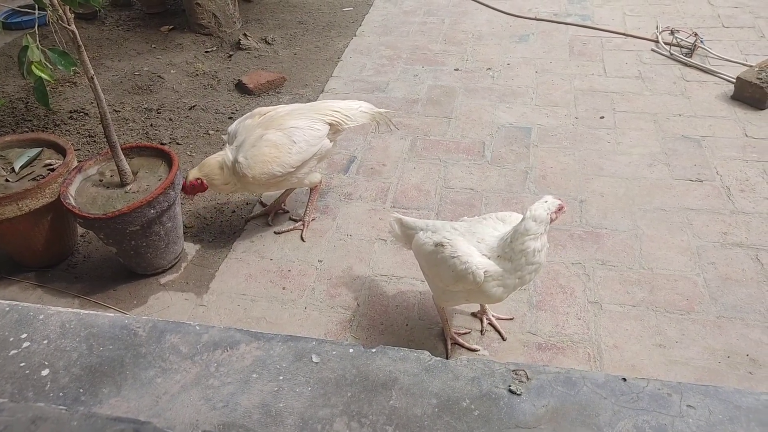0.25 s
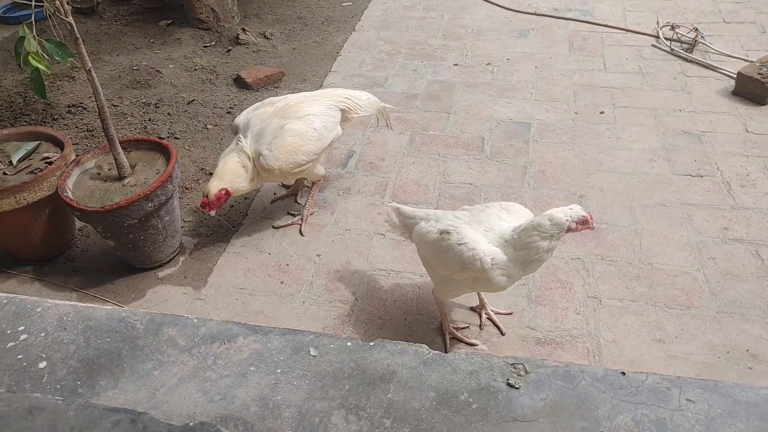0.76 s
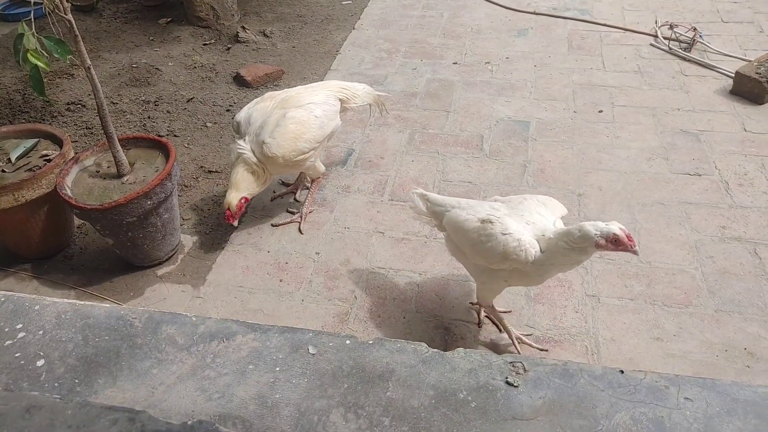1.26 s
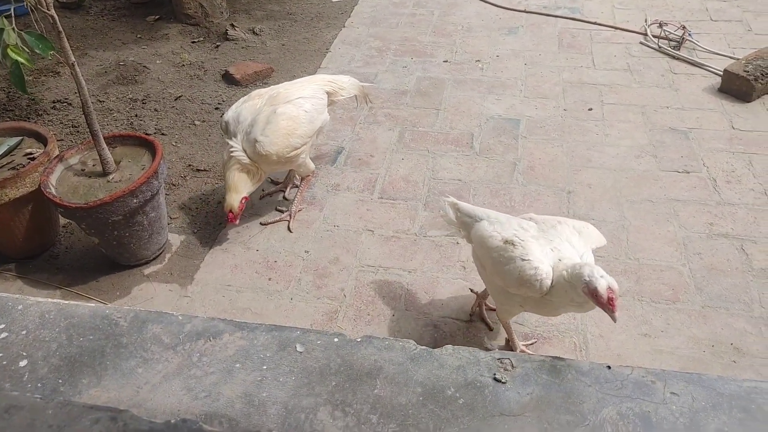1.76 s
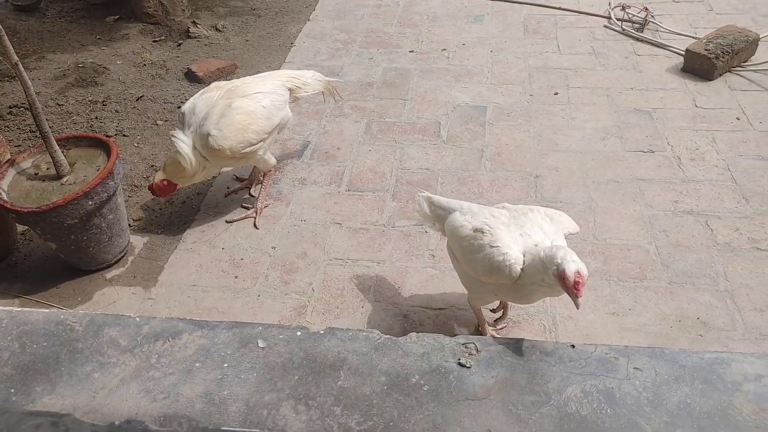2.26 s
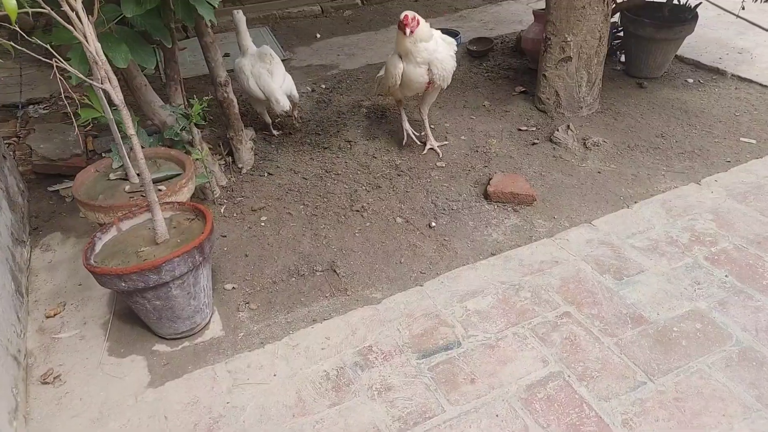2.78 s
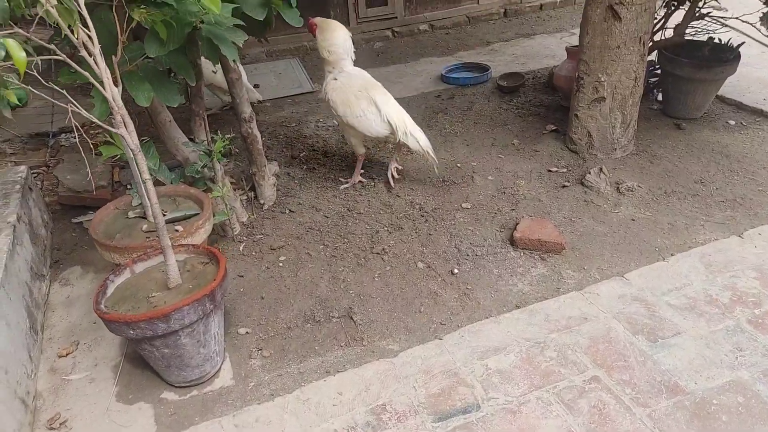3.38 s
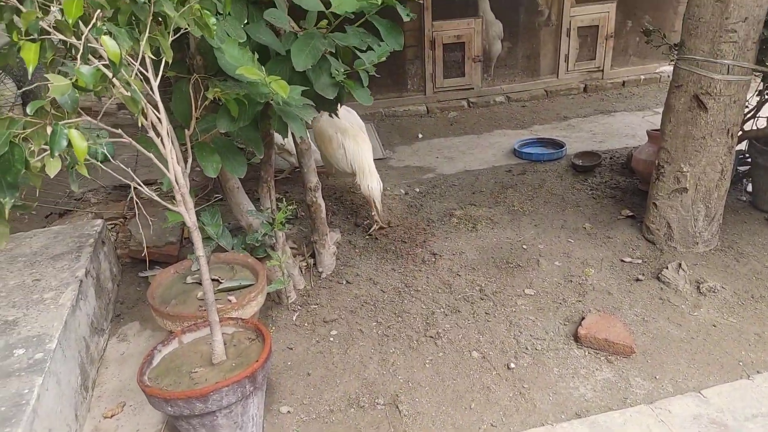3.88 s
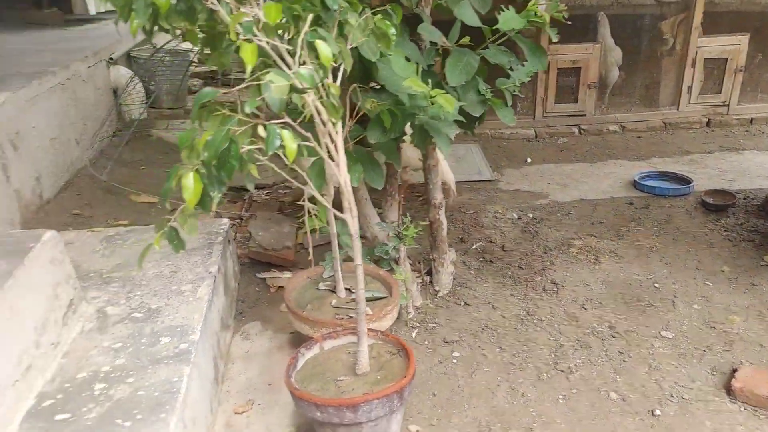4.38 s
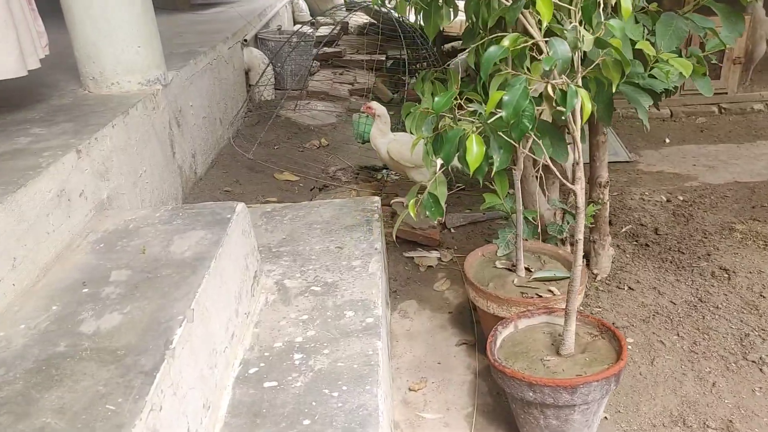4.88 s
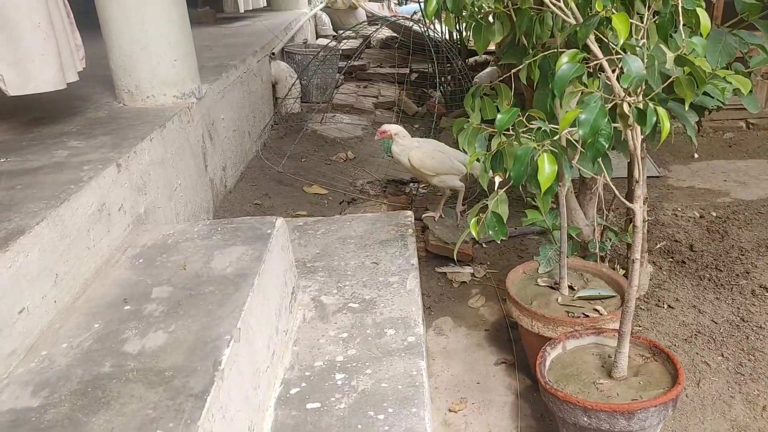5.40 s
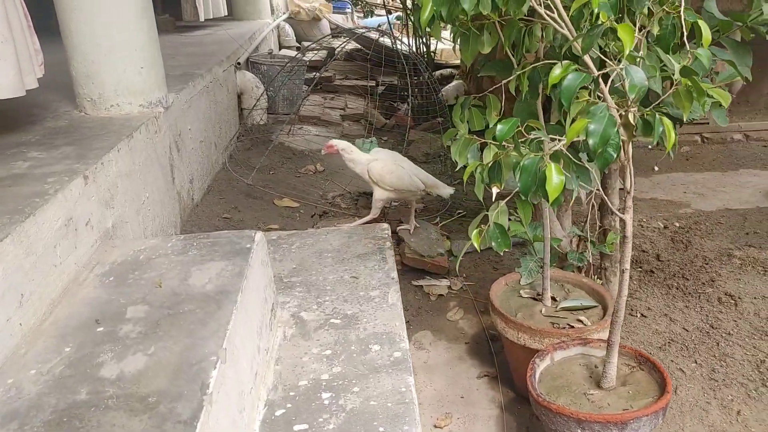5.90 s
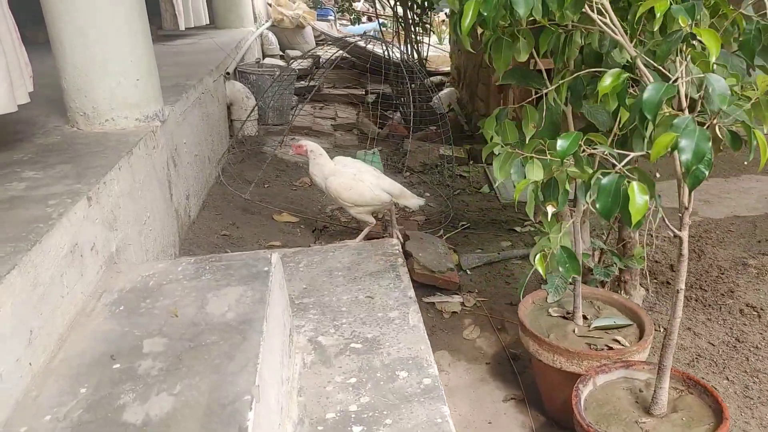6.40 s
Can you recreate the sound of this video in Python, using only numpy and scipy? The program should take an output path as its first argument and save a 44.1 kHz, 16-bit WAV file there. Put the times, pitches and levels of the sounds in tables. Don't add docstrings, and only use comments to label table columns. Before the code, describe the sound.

Constant high chick peeping fills an echoing courtyard, with low hen clucks, raspy squawks, sharp sparrow chips and a brief silent gap midway.

```python
import sys
import numpy as np
from scipy import signal
from scipy.fft import rfft, irfft, next_fast_len
from scipy.io import wavfile
from scipy.ndimage import uniform_filter1d, map_coordinates

SR = 44100
rng = np.random.default_rng(int(sys.argv[2]) if len(sys.argv) > 2 else 0)


def wrap_up_sound(samples):
    columns = np.atleast_2d(samples).T
    tamed = np.clip(columns, -1, 1)
    steps = np.round(tamed * 32767).astype(np.int16)
    wavfile.write(sys.argv[1], SR, steps)


def makeup_ratio(level_db):
    decades = np.asarray(level_db, float) / 20
    return 10 ** decades


N = 293265


def unit(x):
    return x / np.sqrt(np.mean(x ** 2) + 1e-20)


def along(points, hz):
    f, value = np.transpose(points)
    return np.interp(np.log(hz + 1), np.log(f + 1), value)


def curves(rows):
    s, *columns = np.transpose(rows)
    return [np.interp(np.arange(N) / SR, s, column) for column in columns]


def wobble(n, rate):
    knots = rng.standard_normal(int(n * rate / SR) + 4)
    return map_coordinates(knots, [np.arange(n) * rate / SR])


def filtered(x, response):
    m = next_fast_len(x.shape[-1] + SR // 10)
    return irfft(rfft(x, m) * response(np.fft.rfftfreq(m, 1 / SR)), m)[..., :x.shape[-1]]


def modes(rows, f):
    total = 0
    for k, (centre, width, db) in enumerate(rows):
        total = total + (-1) ** k * makeup_ratio(db) * 1j * f * width / (centre * centre - f * f + 1j * f * width)
    return total


# f/Hz, coherence/1
ALIKE = [(40, .05), (85, .45), (140, 1), (300, 0.74), (700, 0.48), (1400, 0.023), (3000, 0.0033)]


def paired(z, hz):
    turn = np.arccos(np.clip(along(ALIKE, hz), -1, 1))[:, None] / 2
    shared, opposed = np.cos(turn) * z[0], np.sin(turn) * z[1]
    return np.array([shared + opposed, shared - opposed])


def rush(gain, patchy_db):
    hz, _, z = signal.stft(rng.standard_normal((2, N)), SR, nperseg=512)
    field = uniform_filter1d(rng.standard_normal(z.shape[1:]), size=6, axis=0)
    field = uniform_filter1d(field, size=12, axis=1)
    noise = signal.istft(paired(z, hz) * makeup_ratio(patchy_db * unit(field)), SR, nperseg=512)[1][:, :N]
    return unit(filtered(noise, gain))


def add(track, s, sound, lag):
    for port, start in zip(track, (round(s * SR), round(s * SR + lag))):
        piece = port[max(start, 0):start + len(sound)]
        piece += sound[max(-start, 0):][:len(piece)]


# t/s, level/dB, length/s, pulse rate/Hz, open beak level/dB
SQUAWKS = [(-.06, -51.5, 0.079, 241.6, -52), (0.397, -49, 0.071, 240.5, -5), (0.92, -45.5, 0.11, 244, -4),
           (1.97, -51.5, 0.1, 258.8, -7.5), (3.094, -42.5, 0.1, 233, -5), (3.325, -70.5, 0.027, 210, -5),
           (3.728, -46, 0.062, 243.3, -0.9), (4.124, -67, 0.072, 262.8, 6), (5.088, -48.5, .084, 229.3, -6),
           (5.991, -42, 0.12, 211.7, -0.5), (6.422, -59, 0.082, 251.2, -8.5),
           (6.605, -42, 0.063, 233.7, -0.5)]
# f/Hz, width/Hz, level/dB
CHEST = [(295, 63, 2.8), (440, 20, 6.3)]
# f/Hz, width/Hz, level/dB
THROAT = [(704, 430, -0.5), (1024, 160, 4.5)]
# f/Hz, width/Hz, level/dB
BEAK = [(1337, 106, -3.5), (1923, 215, -1.5)]


def squawks():
    out = np.zeros((2, N))
    for s, db, length, rate_hz, beak_db in SQUAWKS:
        n = SR // 4
        u = np.clip(np.arange(n) / (length * SR), 0, 1)
        cycle = np.cumsum(rate_hz * (.89 + .16 * np.sin(2.7 * u) + .045 * wobble(n, 120))) / SR
        alternation = 1 + .2 * (-1) ** np.floor(cycle)
        pulses = np.diff(np.floor(cycle), prepend=0) * alternation * makeup_ratio(rng.normal(0, 3, n))
        rasp = rng.standard_normal(n) * np.exp(-3 * (cycle % 1))
        source = (unit(pulses) + .22 * unit(rasp)) * np.sin(np.pi * u ** .85) ** 1.4

        def tract(f):
            resonances = makeup_ratio(-6.5) * modes(CHEST, f) - modes(THROAT, f) - makeup_ratio(beak_db) * modes(BEAK, f)
            return resonances * (f / 330) ** 4 / (1 + (f / 330) ** 4) / (1 + (f / 2200) ** 8)

        voice = filtered(source, tract)
        add(out, s, makeup_ratio(db) * unit(voice) * np.sqrt(n / (length * SR)), 15)
    return out


# t/s, f/Hz, level/dB
CROON = [
    (6.018, 426, -93),
    (6.043, 466.5, -28.5),
    (6.091, 419.6, -40),
    (6.137, 396.3, -34),
    (6.2, 425, -47),
]


def croon():
    hz, level_db = curves(CROON)
    t = np.arange(N) / SR
    gate = np.clip(np.minimum(t - CROON[0][0], CROON[-1][0] - t) / 0.02, 0, 1)
    phase = 2 * np.pi * np.cumsum(hz) / SR
    tone = gate * makeup_ratio(level_db) * (np.sin(phase) + makeup_ratio(1.5) * np.sin(2 * phase))
    return np.array([tone, np.roll(tone, 15)])


# t/s, peak level/dB, f/Hz, length/s, overtone
# level/dB
CLUCKS = [(0.251, -21.5, 532, 0.02, -44), (0.28, -27.5, 535.5, 0.025, -37), (0.445, -17.5, 511, 0.015, -21),
          (.465, -30, 502.7, 0.073, -32), (.54, -30.5, 518, 0.067, -46), (0.685, -19.5, 437.3, 0.026, -22),
          (0.715, -35, 429.6, 0.036, -28), (.743, -35.5, 440, 0.018, -46), (1.125, -25.5, 565, 0.013, -53),
          (1.147, -36, 576, .03, -50), (1.634, -28.5, 590, 0.0095, -42), (1.657, -40, 575, 0.029, -38)]


def clucks():
    out = np.zeros((2, N))
    for s, db, hz, length, over_db in CLUCKS:
        u = np.arange(int(length * SR)) / (length * SR)
        pitch = hz * (1.04 - .07 * u - .3 * np.exp(-u / .13))
        phase = 2 * np.pi * np.cumsum(pitch) / SR
        tone = np.sin(phase) + makeup_ratio(over_db) * sum(np.sin(k * phase) for k in range(2, 5))
        add(out, s - .003, makeup_ratio(db) * np.sin(np.pi * u ** 0.76) ** 1.16 * tone, 14)
    return out


# t/s, f/Hz, level/dB
COOS = [
    [(6.408, 283, -81), (6.425, 294, -32.5), (6.443, 333, -43.5), (6.47, 343.7, -36), (6.492, 407.5, -34.5),
     (6.515, 344, -37), (6.545, 270, -37.5), (6.58, 231, -57)],
    [(4.088, 656, -48), (4.097, 676, -41), (4.11, 770, -59), (4.12, 822, -40), (4.135, 810, -89)],
]
# f/Hz, width/Hz, level/dB
COO_TRACTS = [
    [(270, 16.7, -5), (706, 80, 5.5), (1030, 180, -6.5)],
    [(680, 200, -10), (1470, 270, 6)],
]


def coos():
    out, t = np.zeros(N), np.arange(N) / SR
    for rows, tract in zip(COOS, COO_TRACTS):
        hz, level_db = curves(rows)
        phase = 2 * np.pi * np.cumsum(hz) / SR
        gate = np.clip(np.minimum(t - rows[0][0], rows[-1][0] - t) / 0.004, 0, 1)
        harmonics = sum(abs(modes(tract, k * hz)) * np.sin(k * phase) for k in range(1, 5))
        out += gate * makeup_ratio(level_db) * harmonics
    return np.array([out, np.roll(out, 15)])


def whistle(hz, shape, overtone_db):
    phase = 2 * np.pi * np.cumsum(hz * (1 + 0.0025 * wobble(len(hz), 60))) / SR
    steepness = np.clip(abs(np.gradient(hz)) * SR / 8000, 0, 2.5)
    flutter = makeup_ratio(1.5 * wobble(len(hz), 50) + steepness * wobble(len(hz), 160))
    return shape * flutter * (np.sin(phase) + makeup_ratio(overtone_db) * np.sin(2 * phase))


# t/s, arch length/s, top f/Hz, end f/Hz, level/dB
DIVERS = [(-.06, 0.068, 4885, 2480, -40), (0.213, 0.11, 5240, 2930, -45.5), (0.594, 0.11, 4760, 2820, -46),
          (0.716, 0.1, 5270, 3030, -43.5), (0.969, 0.14, 4720, 2430, -45), (1.141, 0.16, 5316, 3050, -42),
          (1.42, 0.115, 4940, 3500, -43), (1.556, 0.17, 5324, 2770, -40), (2.085, 0.17, 5238, 2810, -45.5),
          (2.728, 0.15, 5336, 3640, -39), (2.932, .15, 5420, 2700, -34), (3.364, .16, 5490, 2850, -36.5),
          (3.882, 0.16, 5420, 2630, -35), (4.451, 0.14, 5320, 2850, -35.5), (5.195, 0.089, 4990, 2630, -38),
          (5.578, 0.13, 5290, 2750, -38), (6.124, 0.076, 5205, 3320, -39.5)]


def divers():
    dive_hz_per_s, arch_depth, knee_s = 31000, .045, 0.0263
    out = np.zeros((2, N))
    for s, arch, top_hz, end_hz, db in DIVERS:
        fall = (top_hz - end_hz) / dive_hz_per_s
        t = np.arange(int((arch + fall + 0.018) * SR)) / SR
        dive = np.clip((t - arch) / fall, 0, 1)
        dive = uniform_filter1d(dive, size=int(knee_s * SR), mode="nearest")
        arched = top_hz * (1 - arch_depth * (np.clip(t / arch, 0, 1) * 2 - .95) ** 2)
        hz = arched * (1 - dive) + end_hz * dive
        shape = np.clip(t / (.35 * arch), 0, 1) * np.clip((t[-1] - t) / .035, 0, 1)
        shape = shape * makeup_ratio(2 * np.sin(np.pi * dive) + 1.5 * dive - 2)
        add(out, s, makeup_ratio(db) * whistle(hz, shape, overtone_db=-17.5 - dive), rng.uniform(-15, 16))
    return out


def glides(calls, bend, overtone_db):
    out = np.zeros((2, N))
    for s, length, start_hz, end_hz, db in calls:
        u = np.arange(int(length * SR)) / (length * SR)
        shape = np.clip(np.minimum(u / 0.085, (1 - u) / 0.024), 0, 1)
        hz = start_hz + (end_hz - start_hz) * u ** bend
        add(out, s, makeup_ratio(db) * whistle(hz, shape, overtone_db), rng.uniform(-18, 14))
    return out


# t/s, length/s, start f/Hz, end f/Hz, level/dB
SLIDERS = [(.17, 0.092, 4030, 3000, -39), (.32, 0.053, 3340, 2870, -46), (.33, 0.17, 4920, 4610, -51),
           (.47, 0.057, 4380, 2620, -41.5), (.85, 0.082, 3990, 2670, -37), (1.2, 0.062, 4550, 3620, -43.5),
           (1.275, 0.055, 3784, 2430, -37.5), (1.515, 0.02, 3050, 2600, -48),
           (1.52, 0.095, 4810, 3524, -47.5), (1.58, 0.039, 2920, 2330, -47),
           (1.89, 0.066, 4640, 3800, -51.5), (1.965, 0.18, 3940, 3180, -44.5),
           (2.06, 0.039, 3370, 2580, -42.5), (2.19, 0.093, 4450, 2970, -46.5),
           (2.31, 0.067, 4490, 2220, -43.5), (2.36, 0.14, 4370, 2960, -43.5),
           (2.385, 0.089, 3546, 2440, -42.5), (.09, .1, 4210, 2900, -47.5), (.77, 0.066, 3610, 3100, -44),
           (.39, 0.12, 4800, 4600, -59),
           (2.663, 0.058, 3300, 2450, -42), (5.47, 0.075, 4330, 3730, -49),
                (5.85, .09, 4340, 3540, -57), (2.669, 0.067, 4230, 3580, -41.5),
                (2.755, 0.12, 3650, 2840, -43.5), (3.027, 0.025, 4480, 4150, -50.5),
                (3.069, 0.075, 3664, 3110, -45.5), (3.187, 0.059, 3670, 2440, -38.5),
                (3.34, 0.093, 4450, 3950, -66), (3.408, 0.13, 4050, 3240, -45.5),
                (3.451, 0.019, 4980, 4320, -37), (3.856, 0.073, 4440, 4380, -51.5),
                (3.971, 0.089, 4310, 3160, -46), (3.933, 0.091, 5000, 4700, -47),
                (4.549, 0.075, 4800, 2660, -39), (4.709, 0.044, 3880, 3010, -41),
                (5.238, 0.066, 4500, 2600, -43), (5.41, 0.12, 4486, 2920, -41.5),
                (5.544, 0.046, 3745, 3090, -41.5), (5.651, 0.057, 4170, 2640, -41.5),
                (5.918, 0.13, 3460, 2510, -50.5), (5.946, 0.15, 4520, 2970, -44),
                (6.151, 0.048, 4460, 3240, -41), (6.38, 0.11, 4670, 4080, -46.5),
                (6.438, 0.073, 4106, 4050, -46), (6.527, 0.097, 3940, 2800, -41),
                (6.196, 0.093, 3200, 2630, -45), (3.87, 0.073, 3300, 2830, -55.5),
                (.09, 0.11, 4070, 2900, -53), (.77, 0.072, 3550, 3080, -40), (4.132, .1, 3096, 2670, -43),
                (5.799, 0.091, 3300, 2900, -52), (.39, .1, 4800, 4600, -51.5)]
# t/s, length/s, start f/Hz, end f/Hz, level/dB
PIPERS = [(.27, 0.062, 5980, 5340, -50), (1.12, 0.16, 6050, 6030, -57), (1.19, 0.24, 6080, 5430, -50),
          (1.56, 0.074, 6070, 5890, -52), (1.65, 0.046, 5970, 5470, -44), (1.89, 0.08, 6370, 5980, -49),
          (2.125, 0.098, 6070, 5520, -48.5), (2.8, 0.18, 6230, 5460, -44), (3.0, .11, 6830, 5650, -50),
          (3.92, 0.055, 6500, 6200, -47.5), (3.975, .08, 6100, 5600, -43), (4.49, 0.062, 6120, 5450, -36.5),
          (5.03, 0.065, 5300, 4900, -48), (5.075, 0.085, 5255, 5140, -46), (5.51, 0.15, 6830, 5410, -44),
          (5.98, 0.12, 6860, 6760, -56), (6.11, 0.031, 5670, 5330, -43), (6.28, 0.16, 5360, 4910, -44.5),
          (3.24, 0.086, 6300, 6500, -62), (5.86, 0.19, 5075, 4850, -47), (6.43, 0.11, 6800, 6820, -55)]


def chicks():
    low = glides(SLIDERS, bend=1.7, overtone_db=-23.5)
    return divers() + low + glides(PIPERS, bend=0.93, overtone_db=-39)


# t/s, length/s, start f/Hz, end f/Hz, level/dB
CHIPS = [(.05, .035, 6960, 5300, -45.5), (.222, .045, 7070, 5420, -47.5), (.755, 0.062, 7000, 5500, -46),
         (.895, 0.03, 6800, 5520, -45), (1.088, .016, 6100, 5300, -57), (1.108, 0.0092, 6060, 5260, -51),
         (1.295, 0.033, 7000, 5700, -44), (1.497, 0.014, 6300, 5500, -51), (1.515, .018, 6400, 5150, -62),
         (1.925, .02, 5900, 5270, -48), (2.06, 0.025, 7000, 5690, -46), (2.064, .018, 6030, 5100, -63),
         (2.875, 0.025, 5870, 5040, -49), (3.115, 0.032, 7100, 5650, -43), (3.205, 0.11, 6700, 4500, -57),
         (3.49, 0.087, 6420, 5500, -62), (3.565, .045, 6220, 5100, -40), (4.04, .05, 7200, 5700, -58),
         (4.085, 0.032, 6830, 5490, -35), (4.342, 0.013, 6980, 5960, -43.5),
         (4.593, 0.028, 6840, 5680, -42.5), (4.632, 0.021, 7000, 5130, -30),
         (4.735, 0.017, 7400, 5560, -44), (4.868, 0.019, 6520, 5210, -42), (5.313, 0.031, 6430, 5290, -32),
         (5.655, 0.062, 7080, 5520, -42.5), (5.755, 0.029, 6540, 5100, -29), (6.06, 0.021, 6700, 5850, -45),
         (6.24, 0.032, 7070, 5150, -30.5), (6.52, 0.051, 6030, 5170, -37.5), (6.61, .035, 6500, 5500, -39)]


def sparrows():
    return glides(CHIPS, bend=0.39, overtone_db=-42.5)


# t/s, level/dB
CLAMOUR = [(0, -48.5), (.6, -49), (1.3, -51), (2.28, -52), (2.6, -46), (2.85, -49.5), (3.15, -47),
           (3.48, -39.5), (3.9, -47), (4.31, -46.5), (4.5, -52.5), (4.65, -39.5), (4.89, -48), (5.2, -49),
           (5.54, -40), (6.4, -46.5), (6.65, -35)]


def far_flock(count=260):
    s, top, drop, length, size = rng.uniform(size=(count, 5)).T[:, :, None]
    n = np.arange(SR // 6)
    u = np.clip(n / ((0.06 + 0.1 * length) * SR), 0, 1)
    hz = (3600 + 3300 * top ** .6) * (1 - (0.05 + 0.25 * drop) * u ** 2)
    tone = np.sin(2 * np.pi * np.cumsum(hz, axis=1) / SR)
    peeps = makeup_ratio(-12 * size - 9 * (1 - top)) * np.sin(np.pi * u) * tone
    sum_of_peeps = np.bincount(((s * N).astype(int) + n).ravel(), peeps.ravel(), N)[:N]
    return makeup_ratio(curves(CLAMOUR)[0] - 6) * unit(sum_of_peeps)


# t/s, level/dB, length/s
SCUFFS = [(1.65, -95, 0.024), (2.933, -58, 0.05), (3.309, -58.5, 0.12), (3.587, -46.5, 0.094),
          (4.212, -59, 0.024), (4.386, -56.5, 0.082), (4.923, -63, 0.13), (5.641, -51, 0.067),
          (5.742, -56, 0.068), (5.828, -60.5, 0.035), (5.906, -60, 0.031), (5.984, -55.5, 0.044),
          (6.619, -44, 0.25)]
# f/Hz, level/dB (per Hz)
GRIT = [(300, -41), (1800, -13), (3000, -6.5), (4600, -9.5), (6100, -4), (7500, -18.5), (10800, -18),
        (15400, -32)]


def scuffs():
    out = np.zeros((2, N))
    for s, db, length in SCUFFS:
        u = np.arange(int(length * SR)) / (length * SR)
        grains = rng.standard_normal(len(u)) * makeup_ratio(3 * wobble(len(u), 300))
        add(out, s, makeup_ratio(db) * np.sin(np.pi * u ** 0.57) ** 2 * unit(grains), rng.uniform(-19, 10))
    tone = lambda hz: makeup_ratio(along(GRIT, hz))
    return filtered(out, lambda hz: tone(hz) / np.sqrt(np.mean(tone(hz) ** 2)))


# t/s, level/dB, length/s
INSECT = [
    (0.333, -58.5, 0.33),
    (1.09, -60, 0.23),
    (1.8, -56, 0.12),
    (2.375, -52, 0.36),
    (2.963, -55, 0.15),
    (4.198, -51, 0.23),
    (4.827, -48.5, 0.3),
    (6.238, -50.5, 0.35),
]


def insect():
    t = np.arange(N) / SR
    bursts = 0
    for s, db, length in INSECT:
        bursts = bursts + makeup_ratio(db) * np.sin(np.pi * np.clip((t - s) / length, 0, 1)) ** 2
    throb = makeup_ratio(3.5 * np.sin(2 * np.pi * np.cumsum(50 + 4 * wobble(N, 4)) / SR))
    ringing = rush(lambda f: modes([(9310, 184, 0)], f) ** 2, patchy_db=6)
    return bursts * unit(throb * ringing)


# f/Hz, level/dB (per Hz)
FLOCK = [(2200, -32), (3200, -31), (4600, -20), (5300, -8), (6000, -2.5), (6700, -10), (7100, -28),
         (8000, -96)]


def flock_blur():
    return makeup_ratio(curves(CLAMOUR)[0] - 6.5) * rush(lambda hz: makeup_ratio(along(FLOCK, hz)), patchy_db=4)


# f/Hz, width/Hz, level/dB
MOTOR = [(138.3, 12.5, 3), (168.1, 6.9, 5.5), (231, 17, -5.5)]
# t/s, level/dB
DRONE = [(0, -61), (1.25, -58), (1.52, -55), (2.04, -59.5), (2.3, -53.5), (2.6, -56), (2.68, -68.5),
         (3.9, -71), (4.31, -62), (4.61, -65), (4.89, -51), (5.54, -70.5), (6.65, -72.5)]


def motor():
    return makeup_ratio(curves(DRONE)[0]) * rush(lambda hz: modes(MOTOR, hz), patchy_db=-2.5)


# f/Hz, level/dB (per Hz)
HISS = [(6500, -38), (8000, -15.5), (9500, 2.5), (11000, -10.5), (15000, -11.5)]


def leaves():
    return makeup_ratio(-69 + 5 * wobble(N, 5)) * rush(lambda hz: makeup_ratio(along(HISS, hz)), patchy_db=8)


# f/Hz, level/dB (per Hz)
AIR = [(20, -37), (60, -23), (230, -19), (700, -21), (1200, -30), (2200, -26.5), (6500, -22.5), (7300, -55)]


def air():
    return makeup_ratio(-55) * rush(lambda hz: makeup_ratio(along(AIR, hz)), patchy_db=-1)


def clutter(x):
    length_s = .09
    t = np.arange(int(length_s * SR)) / SR
    sparse = rng.uniform(size=(2, len(t))) < .03
    taps = rng.standard_normal((2, len(t))) * sparse * makeup_ratio(-30 * t / length_s) * (t > .003)
    return signal.fftconvolve(x, taps / np.linalg.norm(taps, axis=1, keepdims=True), axes=1)[:, :N]


# f/Hz, t60/s
WALLS = [(300, .45), (1000, .42), (3500, .4), (7000, .26), (11000, .15)]


def yard(x):
    hop = 16384
    out, fade = np.zeros((2, N + SR)), np.hanning(2 * hop)
    wide = np.pad(x, (hop, 2 * hop))
    for start in range(0, N + hop, hop):
        hz, t, z = signal.stft(rng.standard_normal((2, SR * 2 // 5)), SR, nperseg=256)
        far_walls = makeup_ratio(-60 * t / along(WALLS, hz)[:, None])
        near_clutter = 0.043 * makeup_ratio(-60 * t / 0.013)
        tail = signal.istft(paired(z, hz) * (far_walls + near_clutter), SR, nperseg=256)[1]
        piece = wide[start:start + 2 * hop] * fade
        wet = signal.fftconvolve(piece[None], tail / np.linalg.norm(tail[0]), axes=1)
        first = start - hop + 200
        out[:, max(first, 0):first + wet.shape[1]] += wet[:, max(-first, 0):N + SR - first]
    return out[:, :N]


def scene():
    hens, clear, sung = squawks() + croon(), clucks(), coos()
    peeps, chips, crowd = chicks(), sparrows(), far_flock()
    steps = makeup_ratio(11.5) * scuffs()
    birds = peeps + makeup_ratio(-6) * chips
    scattered = makeup_ratio(-2) * clutter(birds[::-1]) + makeup_ratio(-4) * clutter(np.array([crowd, crowd]))
    direct = makeup_ratio(-7) * peeps + chips + steps + hens + clear + sung
    voices = makeup_ratio(4.5) * sung[0] + makeup_ratio(2.5) * hens[0] + makeup_ratio(-4.5) * clear[0]
    echo = yard(voices + makeup_ratio(-2.5) * birds[0] + crowd + makeup_ratio(1) * steps[0])
    background = flock_blur() + motor() + leaves() + air()
    return direct + scattered + echo + insect() + background


def gated(x):
    gate_hz, muted_share, bins = 7000, .36, 20
    hz, _, z = signal.stft(x, SR, nperseg=2048)
    bands = np.arange(len(hz)) // bins
    power = np.add.reduceat(np.sum(abs(z) ** 2, axis=0), np.arange(0, len(hz), bins), axis=0)
    is_open = power > np.quantile(power, muted_share, axis=1, keepdims=True)
    kept = is_open[bands] | (hz < gate_hz)[:, None]
    return signal.istft(z * kept, SR, nperseg=2048)[1][:, :N]


def band_limit(x):
    return signal.sosfilt(signal.butter(12, 15690, fs=SR, output="sos"), x)


# f/Hz, left minus right level/dB
PORTS = [(35, -3), (130, 0.2), (1000, -1.5), (2800, -2), (4300, -8.5), (6300, -11), (7500, -1), (9000, 4.5),
         (15000, -3.5)]
# start t/s, end t/s
DROPOUT = (2.6, 2.673)


def record(dry):
    balance = lambda hz: makeup_ratio(np.outer([.5, -.5], along(PORTS, hz)))
    ports = filtered(dry, lambda hz: balance(hz) * (hz < 15300))
    t = np.arange(N) / SR
    start, end = DROPOUT
    back = np.clip(0.52 + (t - end) / 0.8, 0, 1) * (t > end)
    return band_limit(gated(ports) * ((t < start) + back))


dry = scene()
out = record(dry)
wrap_up_sound(out)
```